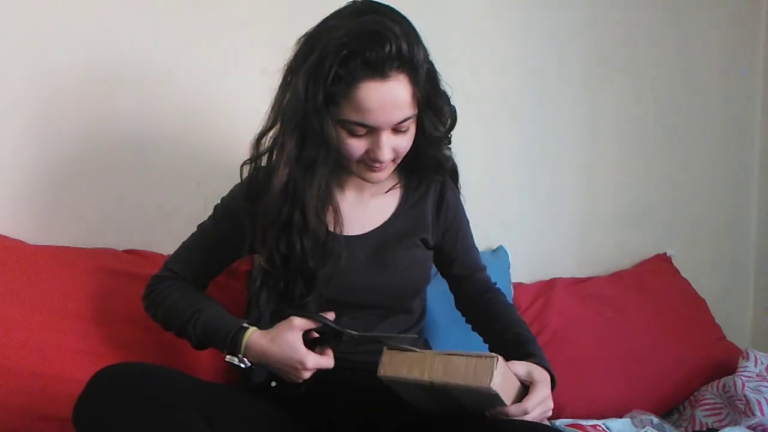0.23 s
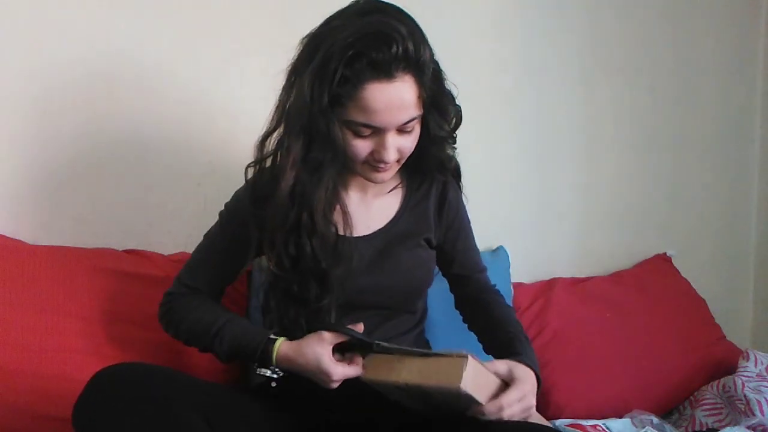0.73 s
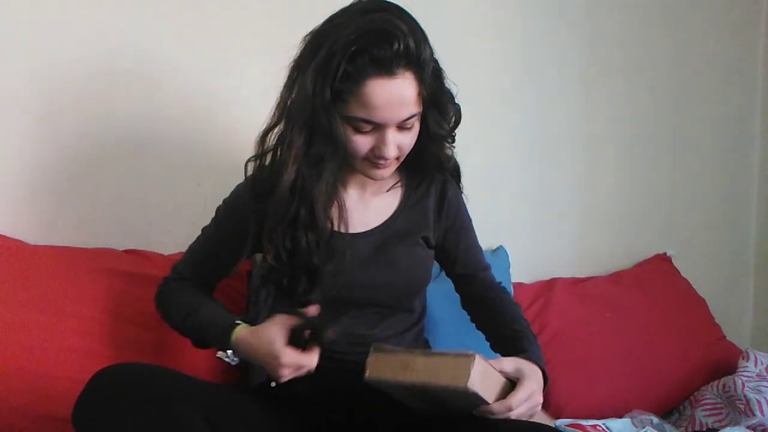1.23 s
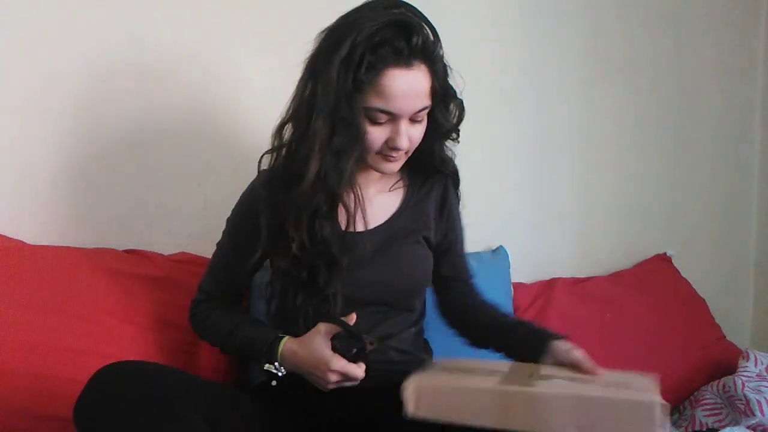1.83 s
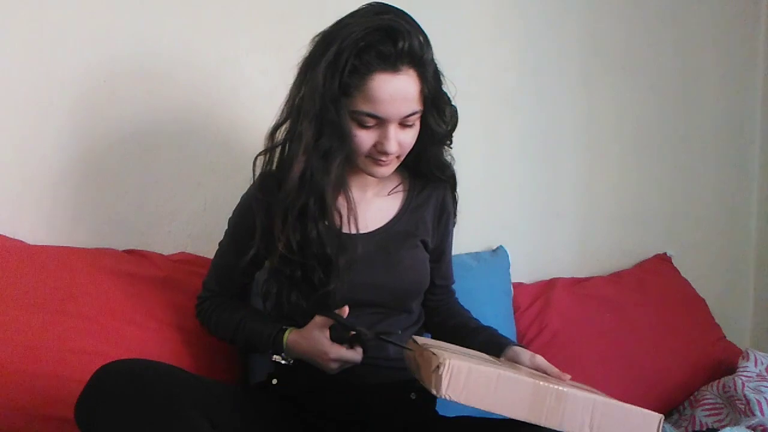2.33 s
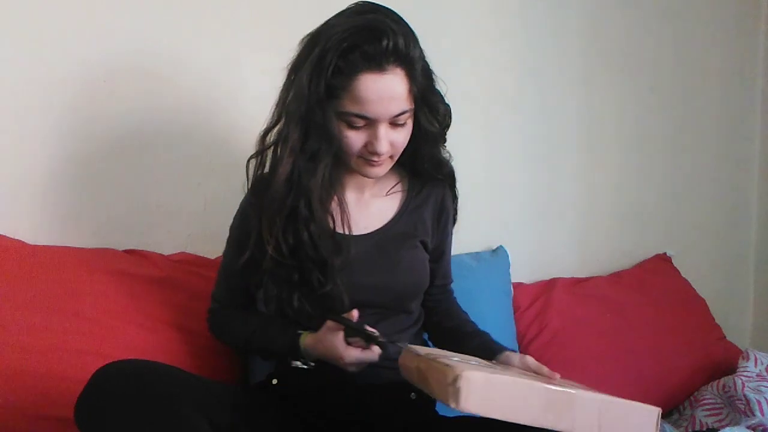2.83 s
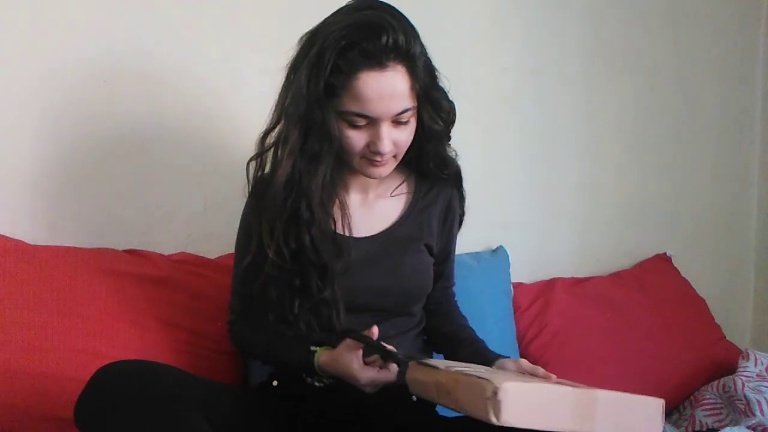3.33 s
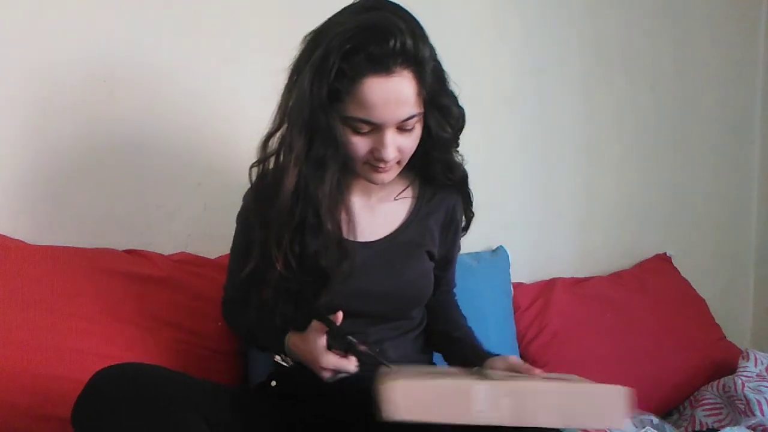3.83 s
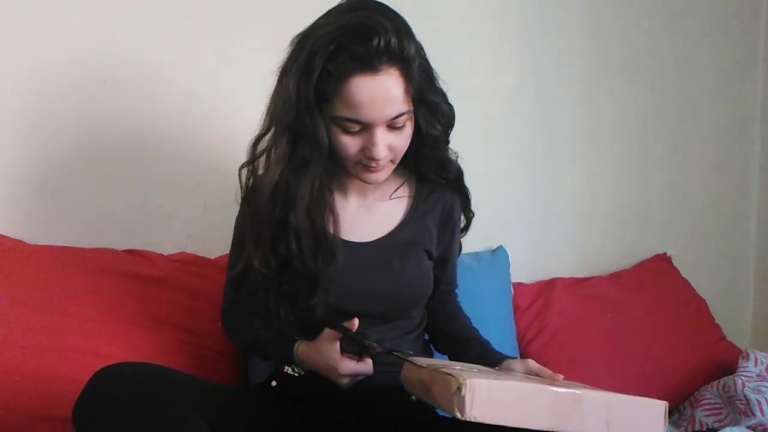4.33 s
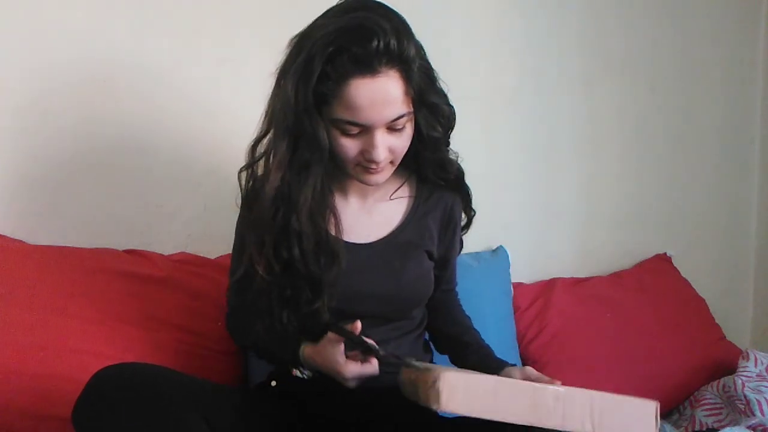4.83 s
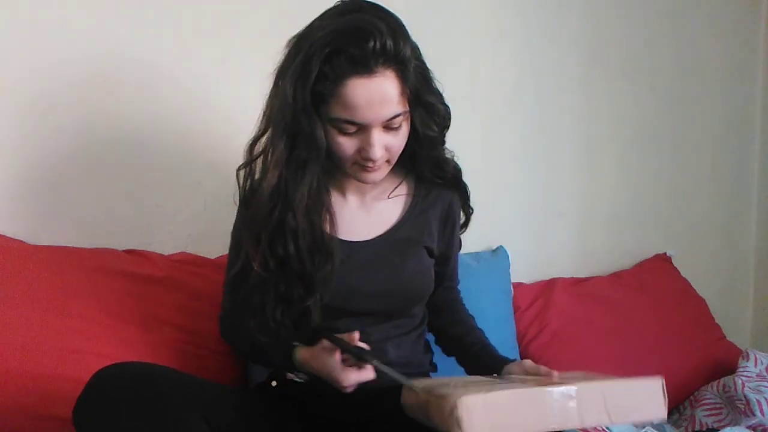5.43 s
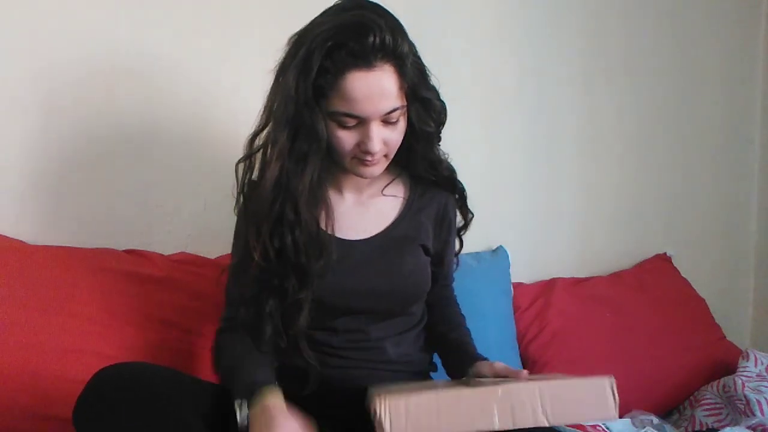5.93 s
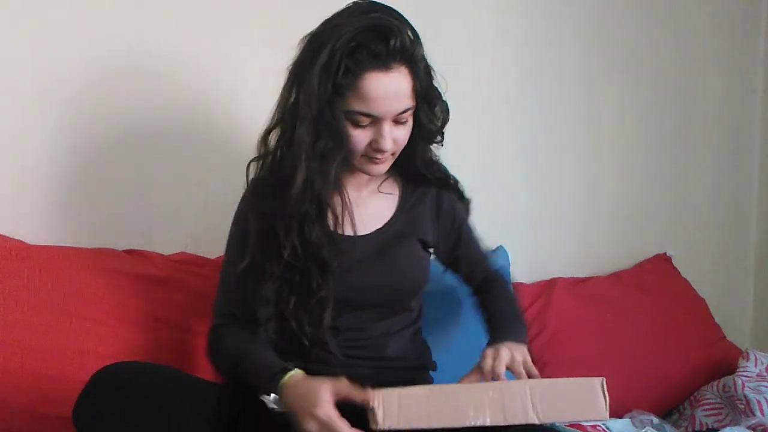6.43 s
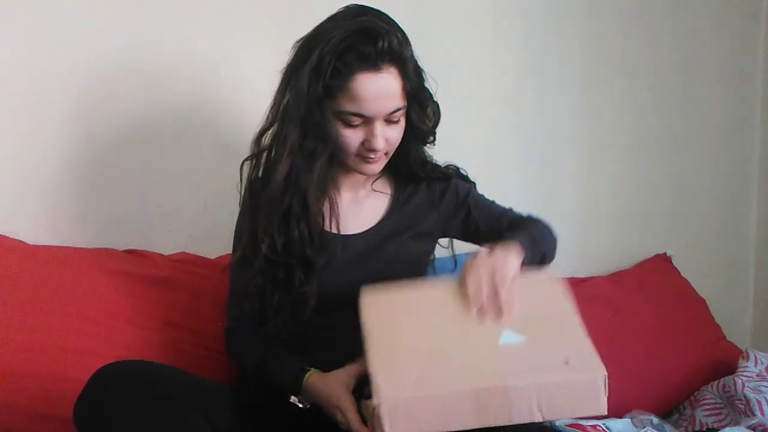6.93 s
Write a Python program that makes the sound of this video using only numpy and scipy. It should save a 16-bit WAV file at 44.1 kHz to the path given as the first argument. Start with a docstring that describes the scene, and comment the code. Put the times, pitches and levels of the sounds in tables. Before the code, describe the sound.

A quiet small room with low airy hiss and soft mattress rumble, in stereo from a couple of metres. Faint ticks open the scene; at about 0.6-0.7 s a cluster of crisp tape snaps lands with a cardboard rasp and scratchy cloth slide, then a smaller snap and grip at 1.0 s. From 1.4 to 2.2 s the box slides softly over cloth. Light taps at 2.4-2.8 s lead to bright, dry snaps at 3.05, 3.2 and most sharply 3.4 s, followed by dull knocks and rubbing around 3.5-3.7 s. Muted bumps come at 4.07 and 4.6 s, with gentle rubs between and after. At 5.6 s a strong hollow cardboard knock sounds, then near quiet and small touches. From 6.6 to 6.95 s the box bends and tips in a fast, loud tumble of woody knocks, creaks and rasps, quickly fading into room hiss.

```python
"""Cutting open a taped parcel

Scissors cut the tape of a cardboard parcel on a bed, a couple of metres from a stereo microphone in a small room.
Tape snaps are short cracks ringing resonances; knocks are decaying sines that drive the modes of the box.
Panels, flaps and edges flex, creak and rasp as random slips excite them; sliding over cloth is dense scratch.
Mattress rumble and air are filtered noise; desk, wall and room answer every sound of tape, box and cloth."""
import sys
import numpy as np
from scipy import signal
from scipy.fft import rfft, irfft
from scipy.io import wavfile

SR = 44100
rng = np.random.default_rng(int(sys.argv[2]) if len(sys.argv) > 2 else 0)


def to_wav(s):
    """Save 16-bit WAV."""
    ch = np.atleast_2d(s).T  # columns
    pcm = np.round(np.clip(ch, -1, 1) * 32767)  # PCM
    wavfile.write(sys.argv[1], SR, pcm.astype(np.int16))


N = 316638


def undb(db):
    """Amplitude ratio: gain from a level in dB."""
    return 10 ** (np.asarray(db) / 20)


def unit(x):
    """Normalisation: scales to rms 1."""
    return x / np.sqrt(np.mean(x ** 2))


def ring(x, hz, width):
    """Simple resonance: two poles, gain 1 at the centre, width in Hz."""
    return signal.lfilter(*signal.iirpeak(min(hz, 0.45 * SR), hz / width, fs=SR), x)


def body(x, modes):
    """Modal superposition: parallel resonances of alternating sign."""
    out = 0
    for k, (hz, width, db) in enumerate(modes):
        out = out + (-1) ** k * undb(db) * ring(x, hz, width)
    return out


def coloured(x, points):
    """Spectral shaping: weights the last axis by (f/Hz, level/dB) points, joined over log frequency."""
    hz, db = np.transpose(points)
    f = np.maximum(np.fft.rfftfreq(x.shape[-1], 1 / SR), 1)
    gain = undb(np.interp(np.log(f), np.log(hz), db))
    return irfft(rfft(x) * gain, x.shape[-1])


def add(track, s, x):
    """Linear superposition: mixes x into track from s seconds on."""
    i = int(s * SR)
    track[i:i + len(x)] += x[:N - i]


def slips(rate, spread_db):
    """Stick-slip: random tiny impulses, rate per second, a few much larger than the rest."""
    happens = rng.random(N) < rate / SR
    strength = rng.standard_normal(N)
    return happens * strength * undb(spread_db * rng.exponential(1, N))


def swells(s, db, rise_s, fall_s, hold_s=0):
    """Exponential growth and decay: climbs 20 dB per rise_s up to s, holds, sinks 20 dB per fall_s; powers add."""
    t = np.arange(0, N, 32)[:, None] / SR
    before = np.maximum(s - t, 0) / np.maximum(rise_s, 0.002)  # at least 2 ms per 20 dB
    after = np.maximum(t - s - hold_s, 0) / np.maximum(fall_s, 0.002)
    gain = np.sqrt(np.sum(undb(db - 20 * (before + after)) ** 2, axis=1))
    return np.interp(np.arange(N) / SR, t[:, 0], gain)


# spectrum of the background air: f/Hz, relative level per Hz/dB
AIR_SPECTRUM = [(15, -46), (25, 17), (54, -4), (76, -3), (155, -5.5), (370, -8.5), (637, -10.5),
                (792, -10.5), (1700, -14.5), (2110, -17), (2620, -18.5), (5040, -27), (15000, -34),
                (16700, -52)]


def air(level_db=-56):
    """Coherence: rumble mostly alike at both ports lies under the independent hiss of each microphone."""
    own = coloured(rng.standard_normal((2, N)), AIR_SPECTRUM)
    shared = coloured(rng.standard_normal(N), AIR_SPECTRUM)
    lowpass = signal.butter(2, 110, fs=SR, output="sos")
    low = signal.sosfiltfilt(lowpass, shared - 0.32 * own)
    return unit(own + low) * undb(level_db)


# the mattress gives under shifting weight: t/s, level/dB
SHIFTS = [(0.68, -45), (1.96, -52.5), (2.12, -59), (2.78, -52), (3.58, -48.5), (4.04, -58), (4.26, -54),
          (4.59, -44), (5.6, -43), (6.15, -44), (6.36, -47.5), (6.66, -46), (6.79, -59), (6.9, -42),
          (7.05, -52)]


def bed(rest_db=-65, rise_s=0.048, fall_s=0.097):
    """Band-limited noise: the mattress rumbles low, swelling as weight shifts; times per 20 dB."""
    band = signal.butter(2, (50, 115), "band", fs=SR, output="sos")
    rumble = unit(signal.sosfilt(band, rng.standard_normal(N)))
    s, db = np.transpose(SHIFTS)
    return rumble * np.hypot(undb(rest_db), swells(s, db, rise_s, fall_s))


# The levels in these three tables are relative: each layer has a trim of its own where it is played.
# slow rubs of box and sleeve over the cloth:
# peak t/s, rise per 20 dB/s, fall per 20 dB/s (below 0.002 acts as 0.002), sliding level/dB, panel level/dB
RUBS = [(0.5, 0.4, -0.2, -70, -57), (0.65, 0.1446, 0.01, -47, -42), (0.93, 2.7, 0.3, -66, -60.5),
        (1.56, 0.32, 0.3, -58.5, -57.5), (1.86, 0.3, 0.2, -57, -57), (3.47, 0.23, 0.3, -58, -56),
        (3.86, 0.45, 0.24, -56.5, -58.5), (4.448, .08, 0.19, -61, -52.5), (4.941, 0.26, 0.12, -57, -52),
        (5.328, 0.05, 0.36, -63.5, -53.5), (5.52, .06, 0.22, -61.5, -52), (4.539, -0.07, -0.3, -54, -57),
        (6.05, 1, .3, -72, -67), (6.27, 0.35, 0.4, -64, -60.5)]
# short grips and pushes on the box: t/s, hold/s, panel level/dB, edge rasp level/dB, sliding level/dB
GRIPS = [(0.019, 0.01, -53, -73, -57.5), (0.664, 0.023, -31.5, -36, -40), (0.74, 0.026, -49, -47, -57),
         (0.956, 0.027, -52, -58, -59.5), (1.009, 0.015, -37, -42.5, -45.5),
         (1.045, 0.015, -51.5, -59, -53.5), (1.255, 0.086, -74, -63, -70.5), (1.358, .02, -53, -65, -67),
         (1.95, 0.0089, -50.5, -52.5, -61), (2.449, 0.023, -58, -56, -67.5),
         (2.687, 0.032, -58, -67.5, -76), (2.766, 0.027, -49, -48.5, -53.5),
         (2.892, 0.024, -55, -62.5, -73), (2.959, 0.037, -52, -66, -73), (3.145, 0.026, -50.5, -52, -62.5),
         (3.345, 0.043, -54.5, -59.5, -86), (3.499, 0.022, -41.5, -39.5, -47.5),
         (3.555, 0.025, -43.5, -46.5, -49.5), (3.666, 0.034, -46.5, -49, -60),
         (4.066, 0.021, -52, -50.5, -89), (4.241, 0.0085, -52.5, -60, -64.5),
         (4.56, 0.037, -39, -42.5, -47), (4.619, 0.011, -35.5, -40, -49.5), (5.531, 0.044, -40, -46, -48),
         (5.572, 0.022, -20.5, -33, -41), (5.628, 0.023, -35.5, -46.5, -49.5),
         (6.14, 0.037, -53.5, -53.5, -65.5), (6.363, .015, -53, -67.5, -77),
         (6.428, 0.036, -54, -50.5, -61)]
# the box is bent and tipped up: t/s, panel level/dB, flap creak level/dB, edge rasp level/dB, sliding level/dB
BEND = [(6.52, -58, -83, -81, -76), (6.585, -46, -48, -45.5, -55.5), (6.615, -56, -62, -52, -64),
        (6.64, -38.5, -48, -43.5, -62), (6.69, -39, -32.5, -40.5, -57.5), (6.725, -53, -51, -41, -58),
        (6.775, -38, -35.5, -38.5, -56.5), (6.84, -31.5, -27.5, -33.5, -48.5),
        (6.89, -36.5, -35.5, -45.5, -48.5), (6.937, -31, -36, -34, -65), (6.96, -40.5, -55, -58, -59),
        (7.07, -67, -66, -68, -69.5), (7.18, -73, -68, -67, -69.5)]


def handling(grip_rise_s=0.017, grip_fall_s=0.038, rub_edges_db=-5, flaps_db=-5.5):
    """Power addition: rubs, grips and the bend sum to gains of panels, flaps, edges and sliding."""
    def layers(panel, edge, slide):
        flap = (panel + edge) / 2 + flaps_db  # creak against the mean of flexing and rasp
        return panel, flap, edge, slide

    s, rise, fall, slide, panel = np.transpose(RUBS)
    rubs = [swells(s, db, rise, fall) for db in layers(panel, panel + rub_edges_db, slide)]
    s, hold, panel, edge, slide = np.transpose(GRIPS)
    grips = [swells(s, db, grip_rise_s, grip_fall_s, hold) for db in layers(panel, edge, slide)]
    s, *levels = np.transpose(BEND)
    t = np.arange(N) / SR
    bend = [undb(np.interp(t, s, db, left=-120)) for db in levels]
    return np.sqrt(np.square(grips) + np.square(rubs) + np.square(bend))


# modes of the cardboard panels, its flaps and its cut edges: f/Hz, width/Hz, relative level/dB
PANEL_MODES = [(205, 31, -12.5), (250, 70, -0.5), (362, 61, 0), (487.5, 81, -1)]
FLAP_MODES = [(587, 36, 2.5), (700, 133, 3.5), (844, 121, 4), (1014, 150, 1.5)]
EDGE_MODES = [(1280, 210, 0), (1683, 223, 3), (3110, 660, -11.5), (4070, 2100, -21.5)]


def hands(panel_gain, flap_gain, edge_gain):
    """Stick-slip excitation: slips flex the panels, creak the flaps and rasp along the cut edges."""
    shared = unit(slips(300, 2.4))  # these slips shake everything at once
    flexing = shared + 0.5 * unit(slips(820, 1.3))
    creaking = shared + 1.8 * unit(slips(1500, 2.4))
    rasping = shared + 0.78 * unit(slips(1500, 2.5))
    panels = unit(body(flexing, PANEL_MODES))
    flaps = unit(body(ring(creaking, 670, 900), FLAP_MODES))
    edges = unit(body(rasping, EDGE_MODES))
    return undb(-4.5) * panel_gain * panels + undb(-1.5) * flap_gain * flaps + undb(-3) * edge_gain * edges


# spectrum of cardboard and sleeve on cloth: f/Hz, relative level per Hz/dB
SLIDE_SPECTRUM = [(880, -50.5), (1500, -23.5), (1690, -6.5), (2110, -8), (3000, -7), (4010, -9),
                  (7770, -12.5), (8420, -14.5), (13200, -17.5), (15900, -19.5), (16500, -55)]


def sliding(gain, alike=0.28):
    """Distributed friction: dense fine scratch from a wide contact, so each port hears partly other fibres."""
    shared = alike * slips(9000, 1.1)
    each_port = np.array([slips(9000, 1.2), slips(9000, 1.7)])
    return undb(2.5) * gain * unit(coloured(shared + each_port, SLIDE_SPECTRUM))


# tape parting or blade nicking it: t/s, relative peak level/dB, ring f/Hz,
# treble level re ring/dB, body level re ring/dB, decay of the fibre noise/ms
SNAPS = [(0.02, -48, 5600, -15, -12, 0.4), (0.0358, -46, 3940, -26, -4, 0.44),
         (0.5842, -45.5, 2570, 14, -13, 0.4), (0.613, -27, 5900, -11, -10, 0.4),
         (0.638, -31, 5500, -14, -16, 0.4), (0.6454, -25, 6130, -17, -19, 0.4),
         (0.6648, -12.5, 5930, -31, -25, 0.4), (0.675, -21.5, 3040, -23, -13, 0.58),
         (0.948, -41, 2920, -25, -8, 0.4), (1.0156, -28.5, 3300, -12, 6.5, 0.36),
         (1.2417, -54.5, 4200, -19, 7.5, 0.4), (2.441, -51, 2980, -25, -14, 0.4),
         (2.4532, -45.5, 2980, -19, -20, 0.4), (2.768, -50.5, 3170, -12, -4.5, 0.4),
         (2.7846, -33, 2770, -6, 4, 0.83), (3.0426, -21, 3050, -1.5, 8.5, 1),
         (3.1576, -48, 3080, 14, 10, 0.27), (3.1797, -21.5, 3170, 12, 1, 0.35),
         (3.1919, -27, 3100, -21, 8.5, 0.83), (3.4217, -13.5, 6150, -0.5, 0.5, 0.26),
         (3.51, -33, 2520, -5, 1, 0.4), (3.5716, -37, 5770, -16, 8, 0.44),
         (4.2462, -53, 3850, -18, 6.5, 0.4), (4.255, -47.5, 3470, -15, -12, 0.4),
         (4.564, -45.5, 3670, 21.5, -4, 0.33), (5.5763, -35, 2860, -27, 10, 0.23),
         (5.5913, -26.5, 3130, -22.5, 3.5, 0.3)]
# faint noise swelling for a few ms before two of the snaps: t/s, length/ms, relative level/dB
LEAD_INS = [(3.0404, 1.8, -31), (3.4172, 4.0, -28)]


def snaps(q=2.46):
    """Impulse excitation: a short crack rings the taut tape, its thin edge and the flap under it."""
    out, ms = np.zeros(N), np.arange(768) * 1000 / SR
    for s, db, hz, treble_db, body_db, decay_ms in SNAPS:
        fibres = rng.standard_normal(len(ms)) * np.exp(-ms / max(decay_ms, 0.05))
        crack = (ms == 0) + 0.079 * fibres  # one clean break, then fibres
        tape = ring(crack, hz, hz / q)
        thin_edge = ring(ring(crack, 12500, 9700), 12500, 9700)
        flap = ring(crack, 1500, 3600)
        snap = 0
        for part, part_db in ((tape, 0), (thin_edge, treble_db), (flap, body_db)):
            snap = snap + undb(part_db) * part / np.abs(part).max()
        add(out, s, undb(db) * snap)
    for s, length_ms, db in LEAD_INS:
        ramp = (ms < length_ms) * ms / length_ms  # grows, then stops
        lead_in = ring(rng.standard_normal(len(ms)) * ramp, 7700, 12000)
        add(out, s, undb(db) * lead_in)
    edges = undb(-1.0) * body(out, EDGE_MODES)
    box = undb(4) * body(out, PANEL_MODES + FLAP_MODES)
    return out + edges + box  # edges and box ring on


# knocks on the cardboard: t/s, relative level/dB, contact ring f/Hz, tick level re knock/dB
KNOCKS = [(0.036, -36, 1450, -6), (0.089, -45, 205, -29), (0.665, -22.5, 320, -14),
          (0.728, -29.5, 1280, -21), (1.012, -30.5, 1240, -21), (1.015, -31, 298, -21),
          (1.354, -43.5, 368, -8), (1.947, -38.5, 270, -8), (2.438, -36, 1770, -17),
          (2.489, -45.5, 348, -20), (2.956, -45, 270, -20), (3.347, -44, 312, -19),
          (3.362, -34.5, 1460, -26), (3.508, -31, 205, -22), (3.536, -18.5, 243, -19),
          (3.603, -31.5, 220, -30), (3.626, -31, 252, -30), (3.658, -34, 342, -27),
          (3.6635, -32.5, 1380, -25), (4.066, -23, 630, -26), (4.0668, -33.5, 1500, -12),
          (4.085, -39, 700, -23), (4.152, -40, 220, -30), (4.243, -46, 350, -15), (4.452, -40, 320, -13),
          (4.562, -33, 480, -27), (4.569, -22.5, 415, -20), (4.618, -25, 282, -23), (4.633, -27.5, 400, -2),
          (5.313, -45, 450, -1), (5.349, -41.5, 347, -20), (5.524, -31, 345, -25), (5.538, -27.5, 132, -32),
          (5.545, -24, 232, -6.5), (5.572, -16, 395, -11), (5.591, -13, 413, -23), (5.599, -8.5, 956, -19),
          (6.142, -33, 347, -14), (6.201, -34, 258, -27), (6.354, -30, 263, -33), (6.436, -25.5, 273, -13),
          (6.477, -32, 1750, -8), (6.58, -29.5, 405, -19), (6.593, -32, 448, -11),
          (6.6242, -23.5, 400, -16), (6.641, -26.5, 364, -29), (6.657, -18.5, 487, -25),
          (6.677, -22.5, 368, -15), (6.69, -15.5, 486, -23), (6.7, -15.5, 740, -18), (6.71, -20, 700, -25),
          (6.735, -7, 720, -25.5), (6.765, -14, 704, -31), (6.783, -5, 740, -27), (6.815, -5.5, 710, -34),
          (6.825, -8, 746, -20), (6.83, -14, 1580, -24), (6.842, -18, 770, -37), (6.851, -7, 700, -28),
          (6.878, -9.5, 890, -22), (6.925, -15.5, 388, -35), (6.938, -17, 1510, -19), (6.94, -19, 400, -31)]


def knocks(cycles=1.73, rise=0.22, box_db=3, tick_ms=1.33):
    """Damped vibration: the spot that is hit ticks, rings for a few cycles and drives the modes of the box."""
    out, ticks, t = np.zeros(N), np.zeros(N), np.arange(2048) / SR
    for s, db, hz, tick_db in KNOCKS:
        envelope = np.exp(-t * hz / cycles) * (1 - np.exp(-t * hz / rise))  # constants in cycles
        add(out, s, undb(db) * np.sin(2 * np.pi * hz * t) * envelope)
        tick = rng.standard_normal(len(t)) * np.exp(-1000 * t / tick_ms)
        add(ticks, s, undb(db + tick_db) * tick)
    box = undb(box_db) * body(out, PANEL_MODES + FLAP_MODES + EDGE_MODES)
    return out + box + undb(12) * ring(ring(ticks, 2000, 3200), 2300, 4400)


# diffuse tail by band: f/Hz, t60/s, level re direct sound/dB
ROOM_BANDS = [(125, 0.12, -8), (247, 0.47, -6.5), (470, 0.38, -12.5), (990, 0.27, -3), (2000, 0.31, -6),
              (4000, 0.25, -5), (8000, 0.24, -3), (14000, .2, -6.5)]
# echo delays at left and right port: desk under the microphone, after the direct sound/ms; far wall/s
DESK_MS = (.67, .70)
WALL_S = (0.024, .0172)


def room(desk_db, near_db, near_s, gap_s=0.0043, wall_db=-15, left_lag=3):
    """Impulse response at each port: direct sound, desk echo, scatter from bed and lap, far wall, diffuse tail."""
    t = np.arange(SR // 2) / SR
    out = np.zeros((2, len(t)))
    octave = np.log2(np.fft.rfftfreq(len(t), 1 / SR) + 1)
    centres = np.log2(np.array(ROOM_BANDS)[:, 0])
    for (hz, t60, db), own in zip(ROOM_BANDS, np.eye(len(ROOM_BANDS))):
        mid, side = rng.standard_normal((2, len(t)))
        apart = min((hz / 500) ** 2, 1)  # long waves reach both ports alike
        noise = (mid + apart * side * np.array([[1], [-1]])) / np.sqrt(1 + apart ** 2)
        weight = np.sqrt(np.interp(octave, centres, own))  # neighbours overlap to an even sum
        noise = irfft(rfft(noise) * weight, len(t))
        fade = np.exp(-np.log(1000) * t / t60) * np.clip(t / gap_s - 0.6, 0, 1)
        out += undb(db) * noise * fade / np.sqrt(np.sum(fade ** 2))
    near = ring(rng.standard_normal((2, len(t))), 5100, 7000) * np.exp(-t / near_s)
    out += undb(near_db) * near / np.sqrt(np.sum(near ** 2, axis=1, keepdims=True))
    for port, lag in enumerate((left_lag, 0)):  # lag in samples
        out[port, lag] += 1
        desk_delay = DESK_MS[port] * SR / 1000 + lag
        out[port] += undb(desk_db) * np.sinc(np.arange(len(t)) - desk_delay)  # between samples
        out[port, int(WALL_S[port] * SR)] += undb(wall_db)
    return out


def scene():
    """Convolution: tape and knocks come from one spot and echo sharply off the desk; the broad box is more diffuse."""
    panel_gain, flap_gain, edge_gain, slide_gain = handling()
    tape = (undb(5.0) * snaps() + undb(-6.0) * knocks())[None]
    tape = signal.fftconvolve(tape, room(desk_db=-5, near_db=-8, near_s=0.0047), axes=1)
    box = hands(panel_gain, flap_gain, edge_gain)[None]
    box = signal.fftconvolve(box, room(desk_db=-16.5, near_db=-4, near_s=0.0063), axes=1)
    cloth = sliding(slide_gain)
    cloth = signal.fftconvolve(cloth, room(desk_db=-15.5, near_db=-6, near_s=0.00087), axes=1)
    return (tape + box + cloth)[:, :N] + bed() + air()


def record(dry):
    """Band limitation: the recorder cuts the deepest bass and the top."""
    bass_cut = signal.butter(8, 39, "high", fs=SR, output="sos")
    top_cut = signal.ellip(10, 0.2, 70, 16100, fs=SR, output="sos")
    return signal.sosfilt(top_cut, signal.sosfilt(bass_cut, dry))


dry = scene()
out = record(dry)
to_wav(out)
```